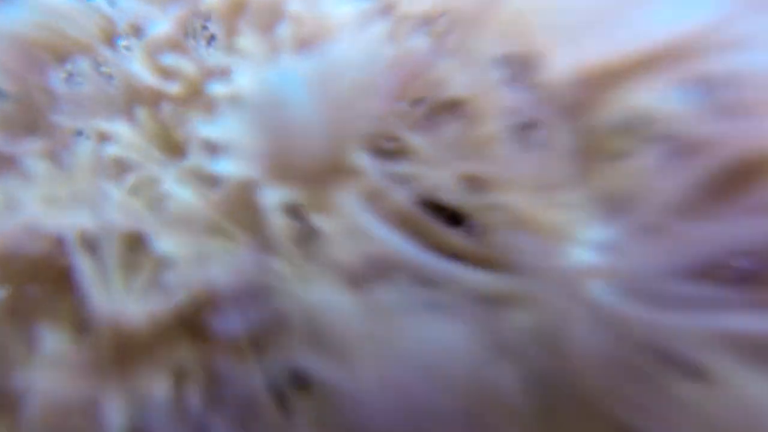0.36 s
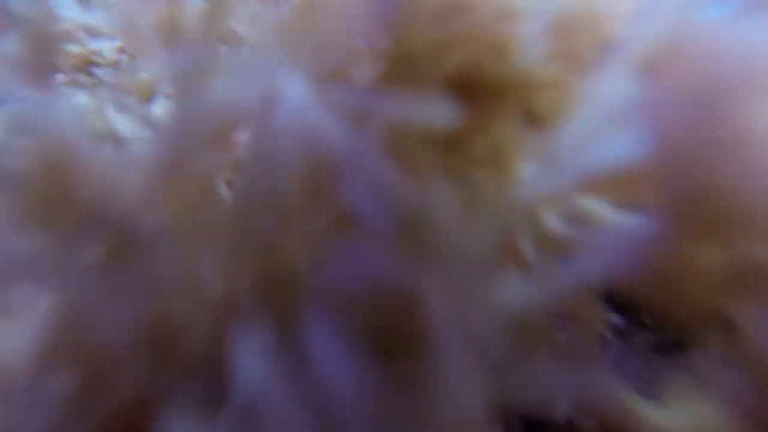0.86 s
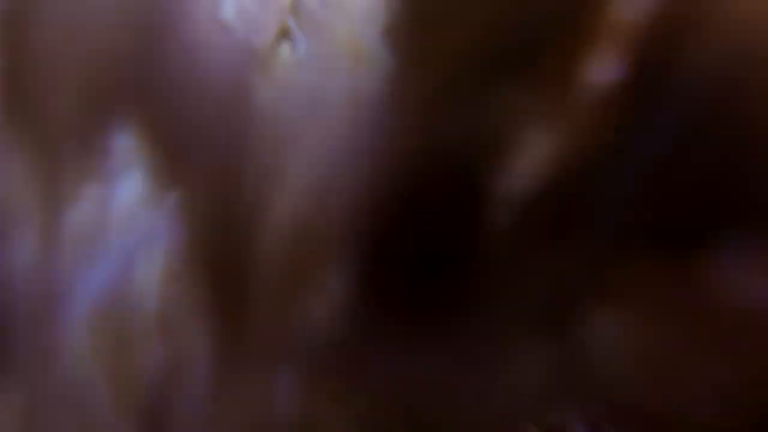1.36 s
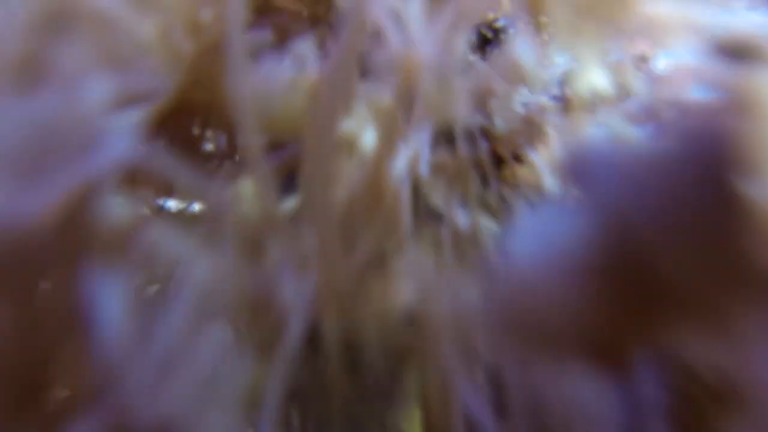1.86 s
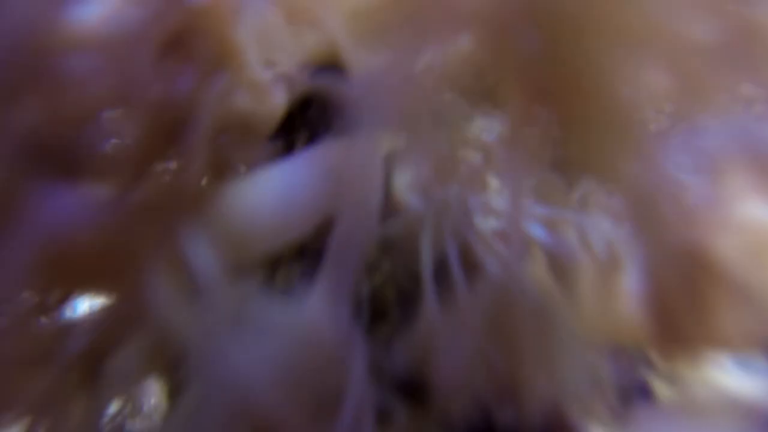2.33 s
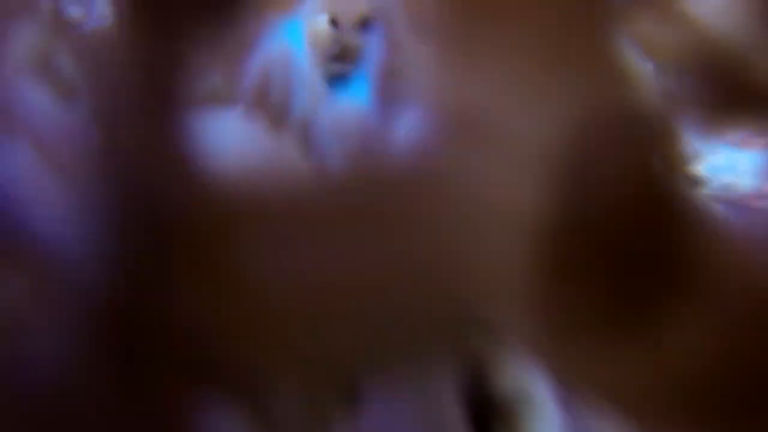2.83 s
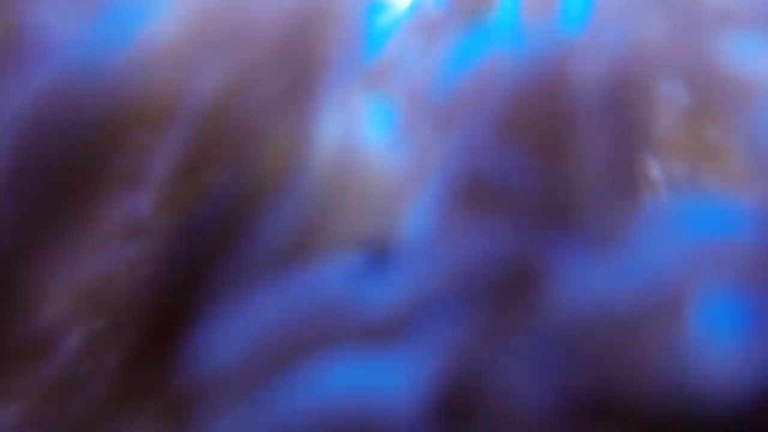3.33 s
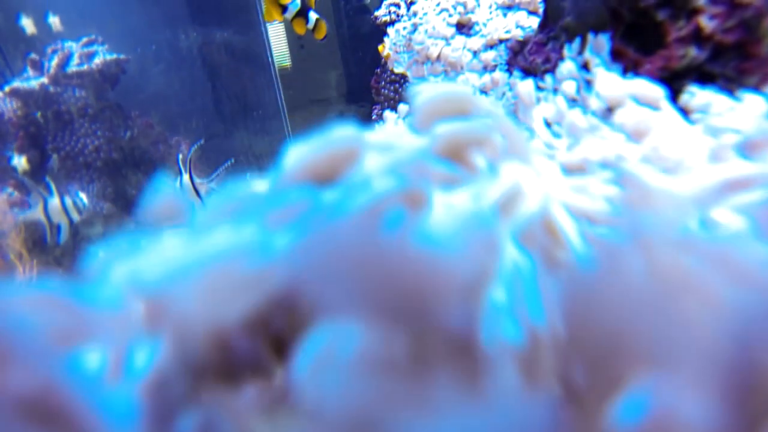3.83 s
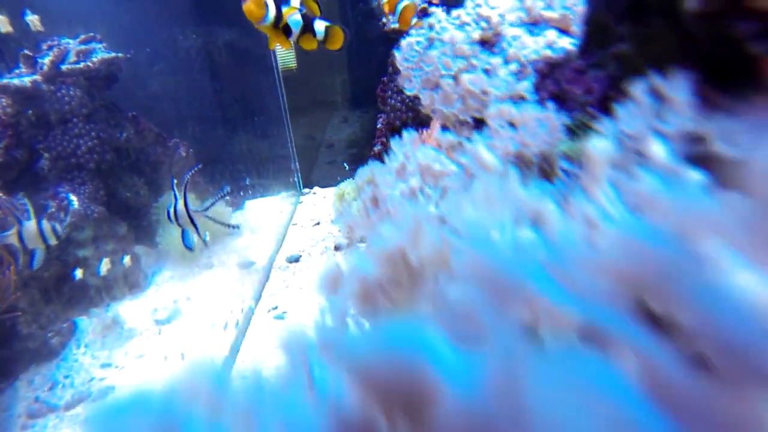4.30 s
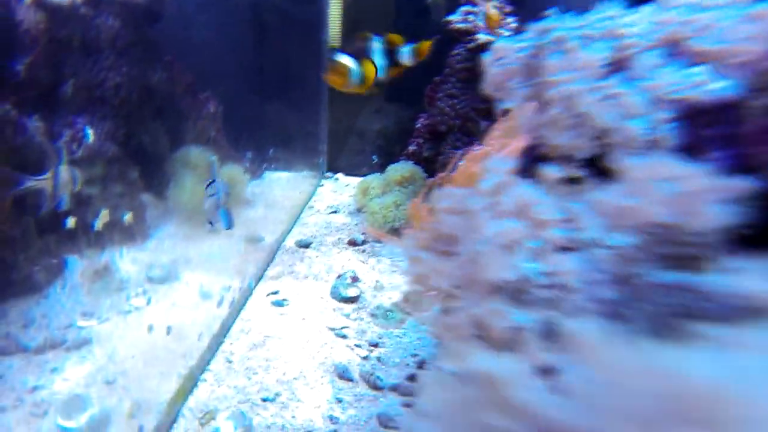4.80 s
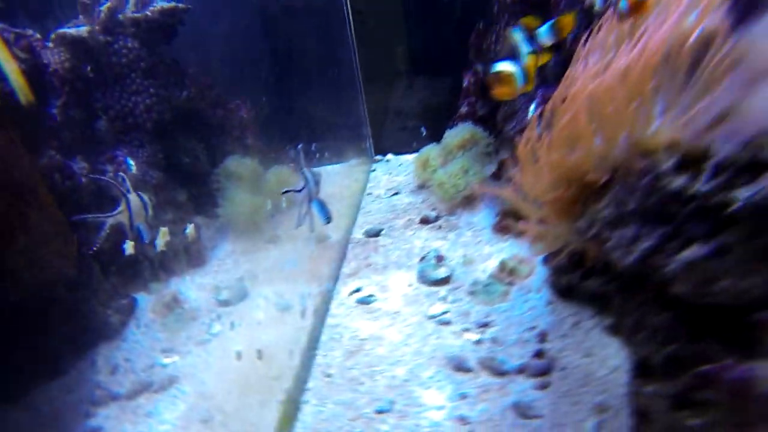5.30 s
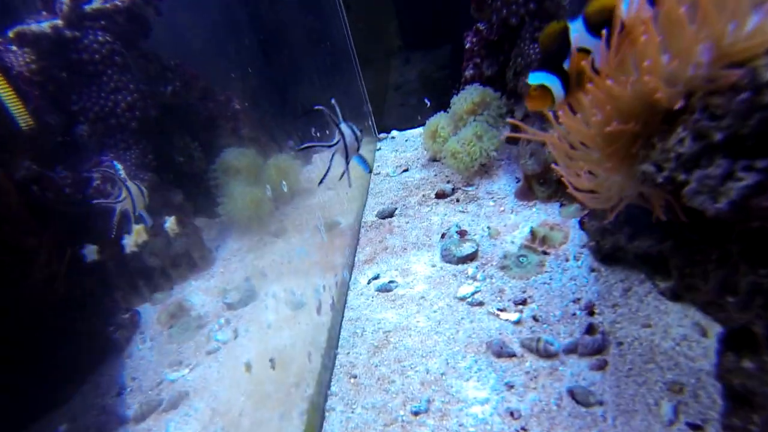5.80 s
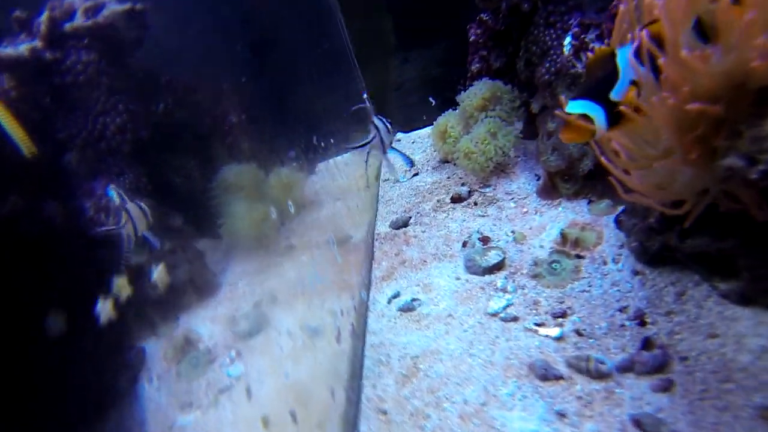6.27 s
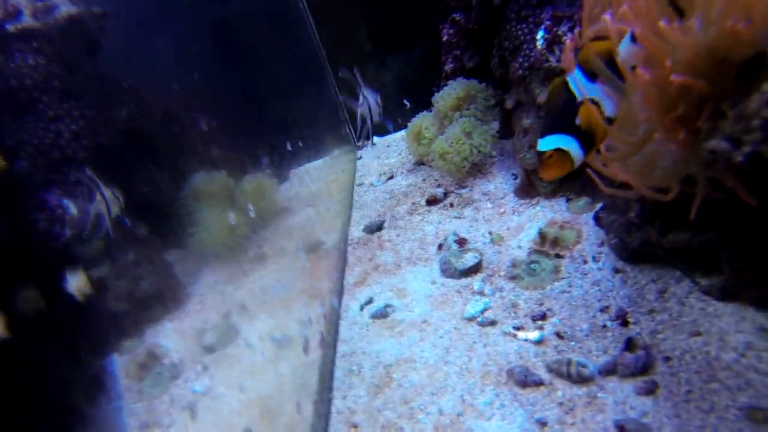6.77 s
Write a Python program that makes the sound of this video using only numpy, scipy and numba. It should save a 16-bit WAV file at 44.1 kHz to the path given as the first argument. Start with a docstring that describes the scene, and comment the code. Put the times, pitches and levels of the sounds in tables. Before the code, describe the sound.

Inside a fish tank, a steady low pump hum and muffled water rush with fine bubble fizz, broken by three hard knocks of the case on rock.

```python
"""Inside a glass fish tank

The microphone sits in a sealed camera case under water. Pumps hum as steady lines at multiples of the mains,
the flow adds a rumble and rush of filtered noise, and bubbles ping as decaying sines that rise in pitch.
Leaving the coral for open water, the case knocks three times on rock: pressed in, let go, its modes ringing.
The recorder's gain control ducks at each knock and creeps back.
"""
import sys
import numpy as np
from scipy import signal
from scipy.fft import rfft, irfft
from scipy.io import wavfile
from scipy.ndimage import uniform_filter1d
from numba import njit

SR = 44100
rng = np.random.default_rng(int(sys.argv[2]) if len(sys.argv) > 2 else 0)


def wrap_up_sound(samples):
    """Save the sound to the file named by the first command line argument, as 16-bit audio."""
    columns = np.atleast_2d(samples).T
    # keep every value between -1 and 1, then stretch to whole-number steps
    tamed = np.clip(columns, -1, 1)
    steps = np.round(tamed * 32767).astype(np.int16)
    wavfile.write(sys.argv[1], SR, steps)


def boost_factor(decibels):
    """Convert a level in decibels to a linear amplitude factor."""
    exponent = np.asarray(decibels, float) / 20
    return 10 ** exponent


N = 315226
T = np.arange(N) / SR

# the microphone's way from the coral to open water: (start [s], end [s])
LEAVE_CORAL_S = (3.33, 7)


def level(x):
    """Scale to rms 1."""
    return x / np.sqrt(np.mean(x ** 2))


def curves(table):
    """Every column after the first, drawn over time in straight lines."""
    s, *columns = np.transpose(table)
    return [np.interp(T, s, column) for column in columns]


def walk(rate_hz):
    """Random levels held for 1 / rate and smoothed twice into a slow wander; spread near 1."""
    hold = int(SR / rate_hz)
    steps = np.repeat(rng.standard_normal(N // hold + 1), hold)
    return 1.3 * uniform_filter1d(uniform_filter1d(steps, hold), hold)[:N]


def colour(x, points):
    """Minimum-phase filter: the (Hz, dB) points with the tank's notches cut in."""
    # cancellations between the glass walls: (frequency [Hz], width [Hz], depth [dB])
    notches = [(401, 24, -10.5), (1008, 55, -7.5), (1262, 79, -6), (1516, 76, -15.5), (2570, 64, -0.5)]
    hz = np.linspace(1, SR / 2, 4097)
    point_hz, point_db = np.transpose(points)
    db = np.interp(np.log(hz), np.log(point_hz), point_db)
    for notch_hz, width_hz, depth_db in notches:
        db = db + depth_db / (1 + (2 * (hz - notch_hz) / width_hz) ** 2)
    # folding the cepstrum onto positive time makes the filter causal
    cepstrum = irfft(np.log(boost_factor(db)))
    cepstrum[1:4096] *= 2
    cepstrum[4097:] = 0
    return signal.fftconvolve(x, irfft(np.exp(rfft(cepstrum))))[:N]


def tank(x, t60=0.032, tail_db=-3):
    """Quick scattered reflections from glass, rock and surface: a decaying noise tail (t60 in s)."""
    t = np.arange(4096) / SR
    tail = rng.standard_normal(len(t)) * 1000 ** (-t / t60)
    tail = tail / np.sqrt(np.sum(tail ** 2))
    return x + boost_factor(tail_db) * signal.fftconvolve(x, tail)[:N]


def modes(x, table, ring=0.93, tilt_db=0.):
    """Ring decaying resonances; ring scales their t60, tilt_db per octave pivots on the second mode."""
    total = 0
    for hz, db, t60 in table:
        pole = np.exp((2j * np.pi * hz - np.log(1000) / (t60 * ring)) / SR)
        gain = boost_factor(db + tilt_db * np.log2(hz / table[1][0]))
        total = total + gain * signal.lfilter([1], [1, -pole], x).imag
    return total


@njit
def pings(n, start, turn, decay, size, glide, rise):
    """Decaying sines that swell in as they start and rise in pitch, as bubbles do.

    turn: rad per sample; decay: factor per sample; glide: share of pitch gained per cycle; rise: swell [rad].
    """
    out = np.zeros(n)
    for g in range(len(start)):
        phase, step, a, i = 0., turn[g], size[g], start[g]
        while i < n and a > size[g] / 300:
            out[i] += a * (1 - np.exp(-phase / rise)) ** 2 * np.sin(phase)
            phase += step
            step = min(step * (1 + glide * step / (2 * np.pi)), 3.)
            a *= decay[g]
            i += 1
    return out


def hum(waver_db=1.06, drift_db=1.5):
    """Pump motors shake at multiples of the mains; each line wavers a little, the upper ones drift alone."""
    mains_hz = 59.97
    # hum as the case moves through the tank's standing waves:
    # (time [s], mains line [dB rms], twice-mains line [dB rms], common level of the upper lines [dB rms])
    hum_levels = [(0, -38, -32, -36), (1.7, -34, -28.5, -39), (2.9, -35, -25.5, -40.5),
                  (3.7, -40, -29, -43), (4.1, -31.5, -31.5, -42.5), (4.6, -27.5, -26, -35),
                  (5.1, -28, -24.5, -37.5), (5.6, -30.5, -25, -46), (6.2, -27.5, -21, -43),
                  (7.15, -24.5, -23.5, -38)]
    # each upper line against their common level: (among the coral [dB], in open water [dB])
    upper_lines = [(0.5, 1.5), (-1, -11), (-17, -12), (-17.5, -11), (-20, -26)]
    # which multiples of the mains the upper lines are
    upper_multiples = (3, 4, 5, 6, 8)
    mains_db, twice_db, upper_db = curves(hum_levels)
    lines = [(1, mains_db), (2, twice_db)]
    for multiple, (coral_db, open_db) in zip(upper_multiples, upper_lines):
        place_db = np.interp(T, LEAVE_CORAL_S, (coral_db, open_db))
        lines.append((multiple, upper_db + place_db + drift_db * walk(1.974)))
    total = np.zeros(N)
    for multiple, line_db in lines:
        sine = np.sin(2 * np.pi * (multiple * mains_hz * T + rng.random()))
        total += np.sqrt(2) * boost_factor(line_db + waver_db * walk(12)) * sine
    return total


def flow(rumble_db, rush_db):
    """Eddies buffet the case below 50 Hz; pumped water rushes up to a few hundred Hz."""
    # spectrum of the rush, relative: (frequency [Hz], density [dB per Hz])
    rush_spectrum = [(26, -30.5), (45, -11.5), (76, -1.5), (125, -9), (161, -5.5), (249, -11), (357, -14.5),
                     (408, -27.5), (477, -18), (660, -36), (800, -39), (1040, -62.5), (1760, -120)]
    band = signal.butter(2, (9, 38), "bandpass", fs=SR, output="sos")
    rumble = level(signal.sosfilt(band, rng.standard_normal(N)))
    rush = level(colour(rng.standard_normal(N), rush_spectrum))
    return boost_factor(rumble_db + 2.8 * walk(4.3)) * rumble + boost_factor(rush_db + 1.7 * walk(9)) * rush


def knocks(press_db=-2.0, lag_s=.0007):
    """The wall is pressed in, springs back into the body modes and ticks; the last knock drags along the rock."""
    # case on rock, levels before the case passes them on: (release [s], blow [dB], press length [s], tick [dB],
    # ring length of the body modes against their free t60 [ratio], favour to upper modes [dB per octave])
    contacts = [(3.4629, -14.5, 0.0018, -19.5, 0.26, -2.5), (3.4656, -5.5, 0.0025, -20.5, 0.79, 11),
                (3.4702, -11, 0.0026, -28.5, 0.36, 7), (3.4768, -16, 0.0018, -32, 1.6, -6),
                (3.928, -0.5, 0.0034, -11.5, 0.38, -2), (4.2126, 0.5, 0.00071, -6.5, 0.32, -0.5),
                (4.2162, -1, 0.00059, -1, 0.34, -8), (4.2213, -10.5, 0.0016, -6, 0.41, 1),
                (4.2255, 3, 0.0028, -7.5, 1.23, -5.5)]
    # the drag: (start [s], end [s], level [dB])
    scrape = (4.2118, 4.2285, -26)
    # bending modes of the case, moved by the push: (frequency [Hz], level [dB], free t60 [s])
    case_body = [(68.6, -18, 0.39), (148, -2, 0.049), (234, -5, 0.033), (32.6, -29.5, 0.6)]
    # wall modes of the case, rung by the tick: (frequency [Hz], level [dB], t60 before the ring factor [s])
    case_wall = [(1314, -5.5, 0.016), (1748, 0, 0.0092), (2140, -7, 0.0075), (2800, -6.5, 0.0082),
                 (3280, -9.5, 0.0076), (4510, -3, 0.0031), (5770, -8.5, 0.0038), (8640, -16.5, 0.0039),
                 (9920, -14.5, 0.0071), (12900, -19, 0.003), (14000, -24, 0.0033)]
    thump, tick = np.zeros(N), np.zeros(N)
    kick = np.pad(np.hanning(40) / 20, (0, 12000))
    for s, blow_db, length_s, tick_db, ring, tilt_db in contacts:
        i, n = int(s * SR), max(int(length_s * SR), 8)
        let_go = n // 4
        press = np.interp(np.arange(n + let_go), (0, n, n + let_go), (0, 1, 0))
        thump[i - n:i + let_go] -= boost_factor(blow_db + press_db) * press
        thump[i:i + len(kick)] += boost_factor(blow_db) * modes(kick, case_body, max(ring, .05), tilt_db)
        grit = rng.standard_normal(96) * np.hanning(96)
        late = i + int(lag_s * SR)
        tick[late - 48:late + 48] += boost_factor(tick_db) * grit / np.sqrt(np.sum(grit ** 2))
    start_s, end_s, drag_db = scrape
    drag = (T > start_s) & (T < end_s)
    tick = tick + boost_factor(drag_db) * drag * rng.standard_normal(N)
    # between its bending and its wall modes the case passes little
    soft = signal.sosfilt(signal.butter(4, 420, fs=SR, output="sos"), thump)
    hard = tank(modes(tick, case_wall) + boost_factor(-4.5) * tick, 0.086, -25)
    hard = signal.sosfilt(signal.butter(4, 1050, "highpass", fs=SR, output="sos"), hard)
    return boost_factor(3.5) * soft + hard


def bubbles(cycles=50, count=2, chance_count=60, chance_db=-33, open_db=-4, low_hz=1150):
    """Larger bubbles heard one by one, middling ones at random; each sheds fainter ones within 13 ms."""
    # the loudest bubbles, before swell and reflections: (time [s], peak [dB], starting pitch [Hz])
    loudest = [(0.073, -23, 1780), (0.1216, -28.5, 1420), (0.618, -27.5, 1380), (0.7664, -24, 1850),
               (0.8588, -25.5, 1380), (0.9195, -28, 2840), (0.9937, -24, 1890), (1.0094, -33, 1110),
               (1.0864, -29, 1790), (1.2925, -29.5, 2880), (1.3104, -24, 1890), (1.323, -12.5, 2174),
               (1.6012, -21.5, 2500), (2.0676, -30, 1394), (2.3317, -29, 1700), (2.5477, -30, 3030),
               (2.7295, -30, 1340), (2.7968, -29.5, 1900), (2.9225, -29, 1790), (3.3206, -23, 1314),
               (3.4411, -26, 1900), (3.5013, -23, 1950), (3.7425, -28, 2080), (3.920, -28, 1800),
               (4.0187, -23.5, 2080), (4.074, -25.5, 2600), (4.584, -24.5, 1133), (4.8868, -31.5, 1357),
               (4.958, -29.5, 1620), (5.0749, -23.5, 1620), (5.1307, -29.5, 1084), (5.7404, -28, 2440),
               (5.9952, -29.5, 1820), (6.092, -31, 2930), (6.104, -33, 1940), (6.8599, -30, 2930)]
    when, loud, pitch = rng.random((chance_count, 3)).T
    middling_s = when * N / SR
    middling_db = chance_db - 5 * loud + np.interp(middling_s, LEAVE_CORAL_S, (0, open_db))
    middling = [middling_s, middling_db, low_hz * 2 ** (1.5 * pitch)]
    s, db, hz = np.append(np.transpose(loudest), middling, axis=1)
    chance = rng.random((len(s), 3, count))
    s = np.append(s, s[:, None] + 0.013 * chance[:, 0])
    db = np.append(db, db[:, None] - 11.0 - 8 * chance[:, 1])
    hz = np.append(hz, hz[:, None] * 2 ** (1.1 * chance[:, 2] - .45))
    decay = 1000 ** (-hz / cycles / SR)  # 60 dB down after this many cycles
    dry_pings = pings(N, (s * SR).astype(np.int64), 2 * np.pi * hz / SR, decay, boost_factor(db), 0.00087, 3.8)
    return tank(dry_pings, 0.026, -7.5)


def fizz(fizz_db, count=9000):
    """A swarm of small bubbles, louder in spurts, over a fine hiss, coloured by the place in the tank."""
    # colour among the coral, relative: (frequency [Hz], density [dB per Hz])
    coral_colour = [(350, -39.5), (600, -11.5), (829, -7), (974, -13), (1100, -5), (1240, -4.5), (1360, 1),
                    (1520, -6), (1810, -1), (2160, -1.5), (3700, -13.5), (4290, -27.5), (5460, -24),
                    (6960, -33), (15000, -42.5)]
    # colour in open water, relative: (frequency [Hz], density [dB per Hz])
    open_colour = [(350, -51.5), (600, -20), (911, -9), (1040, -11), (1380, -3), (1520, -8), (1790, -3.5),
                   (2130, -9), (2900, -1.5), (3460, -13.5), (4970, -21.5), (5460, -23.5), (7600, -30),
                   (8700, -25.5), (9490, -30.5), (10600, -33), (15000, -41)]
    when, pitch, ring, loud = rng.random((count, 4)).T
    start = (when * N).astype(np.int64)
    hz = 700 * 20 ** pitch
    cycles = 7 * 4 ** ring
    spurt_db = 1.86 * walk(50)[start]
    # small bubbles ring briefly, so they need more size for an even spectrum
    size = hz / np.sqrt(cycles) * boost_factor(np.minimum(-3.5 * np.log(loud), 15) + spurt_db)
    decay = 1000 ** (-hz / cycles / SR)
    swarm = pings(N, start, 2 * np.pi * hz / SR, decay, size, 0.0032, 10.0)
    hiss = boost_factor(-1.5 + 1.4 * walk(14)) * rng.standard_normal(N)
    water = level(tank(swarm)) + hiss
    out_share = np.interp(T, LEAVE_CORAL_S, (0, 1))
    coral = level(colour(water, coral_colour))
    open_water = level(colour(water, open_colour))
    return boost_factor(fizz_db) * ((1 - out_share) * coral + out_share * open_water)


def water_levels():
    """Rumble, rush and fizz in dB over time; surges in the flow bring a splash of bubbles."""
    # water at the case, before the surges: (time [s], rumble [dB], rush [dB], fizz [dB])
    water = [(0, -31, -39, -44.5), (1.3, -37, -38.5, -45.5), (2.3, -30, -37, -45),
             (3.25, -27.5, -37.5, -47), (3.7, -24.5, -37.5, -50), (4.2, -32.5, -34.5, -47.5),
             (4.75, -24.5, -33, -45), (5.4, -27.5, -39.5, -50.5), (6.2, -30.5, -43, -51),
             (6.6, -25.5, -43, -54.5), (7.15, -21, -40.5, -52)]
    # surges in the flow: (time [s], length [s], rush rise [dB], fizz rise [dB])
    surges = [(1.613, 0.023, 2.5, 3), (1.687, 0.039, 8.5, 2), (6.103, 0.011, -1, 3.5),
              (6.343, 0.027, 3.5, 6), (6.392, 0.033, 11.5, 2), (6.748, 0.028, 8, 7)]
    rumble_db, rush_db, fizz_db = curves(water)
    for s, length_s, rush_rise_db, fizz_rise_db in surges:
        swell = np.exp(-.5 * (2 * (T - s) / length_s) ** 2)
        rush_db = rush_db + rush_rise_db * swell
        fizz_db = fizz_db + fizz_rise_db * swell
    return rumble_db, rush_db, fizz_db


def scene():
    """Everything that reaches the microphone inside the case."""
    rumble_db, rush_db, fizz_db = water_levels()
    mix = hum() + flow(rumble_db, rush_db) + knocks() + bubbles() + fizz(fizz_db)
    return mix[None]


@njit
def gain_control(x, top, attack, release):
    """The held peak sinks steadily; the gain follows top / peak with a lag, so the first swing gets through."""
    y, peak, g = np.empty(len(x)), top, 1.
    for i in range(len(x)):
        peak = max(abs(x[i]), peak * release, top)
        g += attack * (top / peak - g)
        y[i] = g * x[i]
    return y


def roll_off(x):
    """The treble ends steeply here."""
    return signal.sosfilt(signal.butter(12, 15300, fs=SR, output="sos"), x)


def record(dry):
    """The recorder's gain control, then a hard ceiling at full scale."""
    top_db, attack_s, release_db_per_s = -8.0, 0.02, -15
    held = gain_control(dry[0], boost_factor(top_db), 1 / (attack_s * SR), boost_factor(release_db_per_s / SR))
    mix = np.clip(held, -1, 1)[None]
    return roll_off(mix)


dry = scene()
out = record(dry)
wrap_up_sound(out)
```